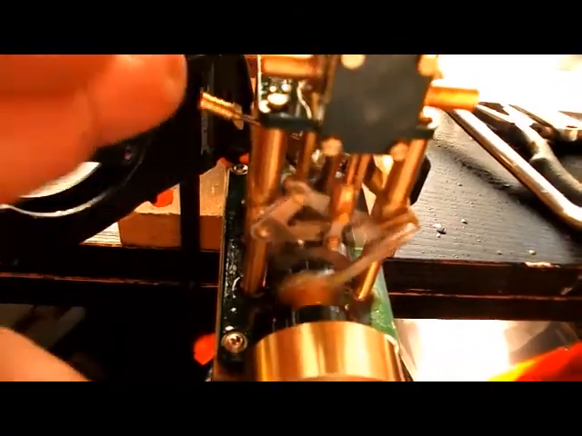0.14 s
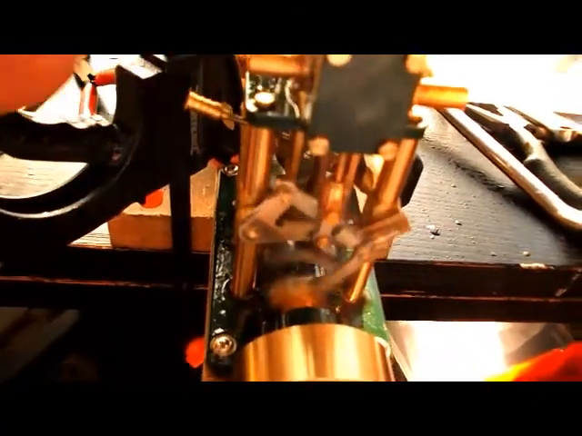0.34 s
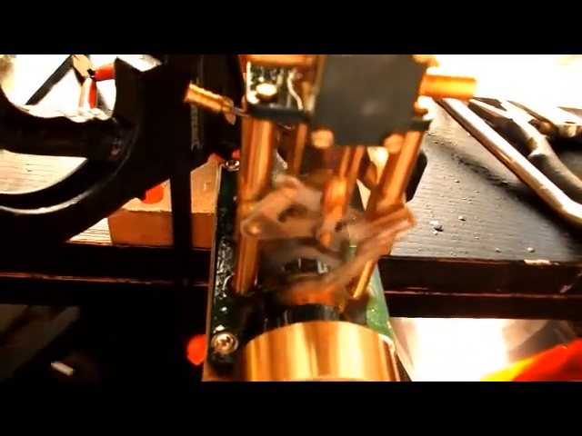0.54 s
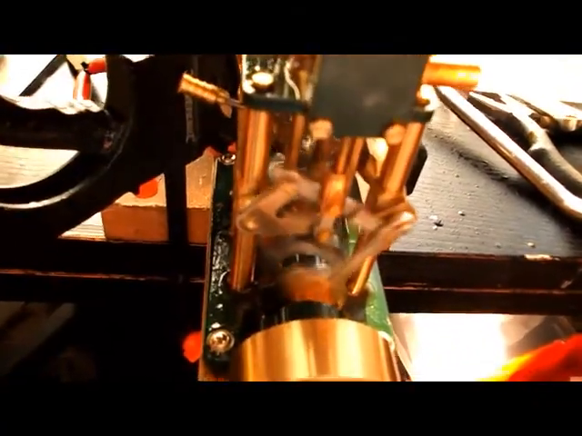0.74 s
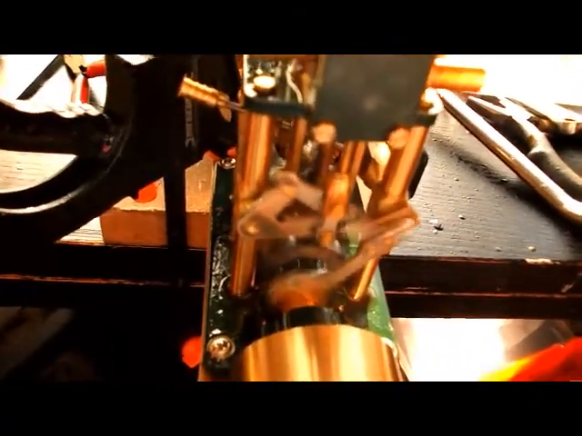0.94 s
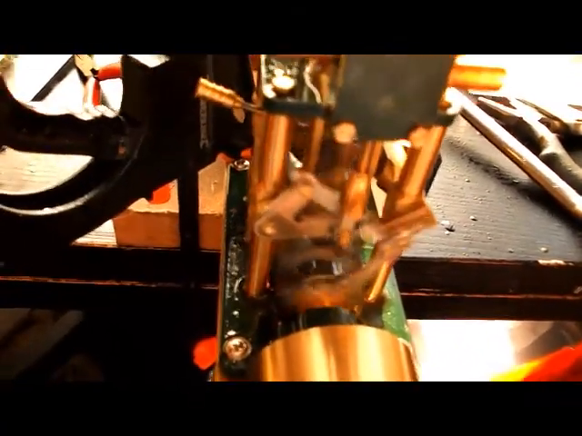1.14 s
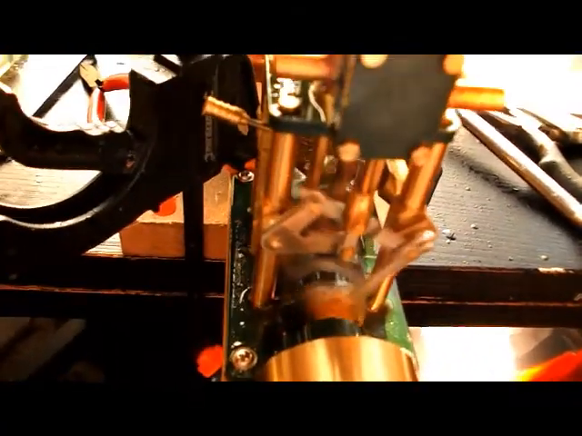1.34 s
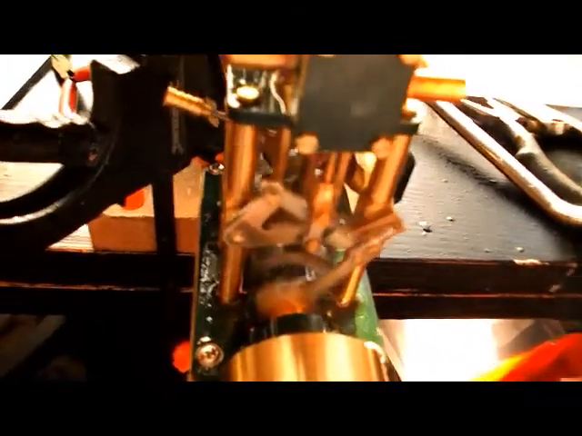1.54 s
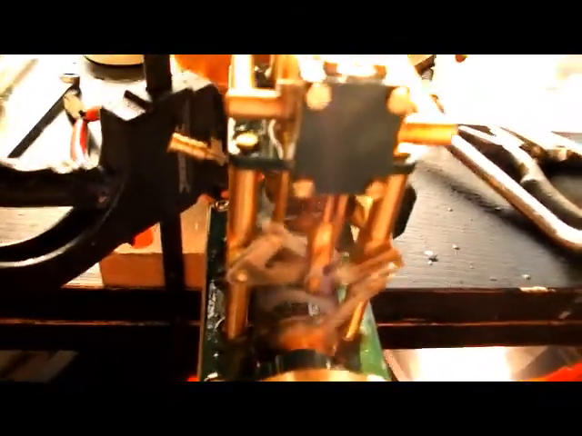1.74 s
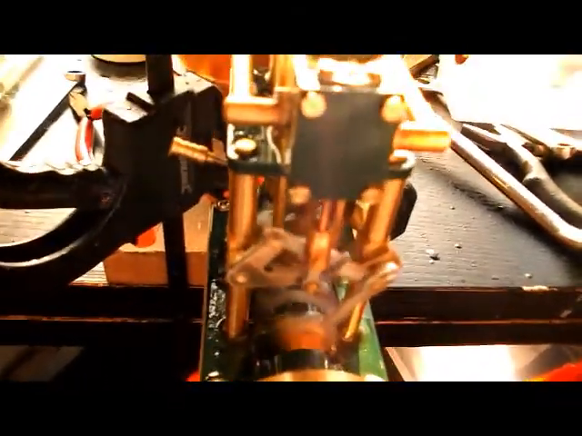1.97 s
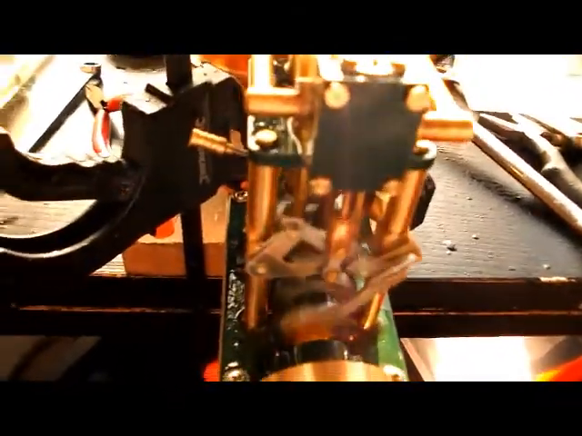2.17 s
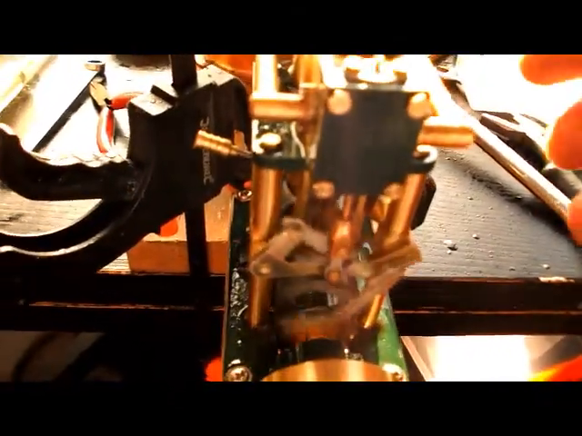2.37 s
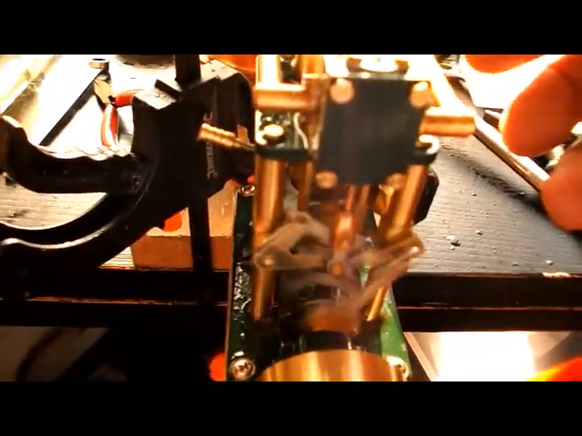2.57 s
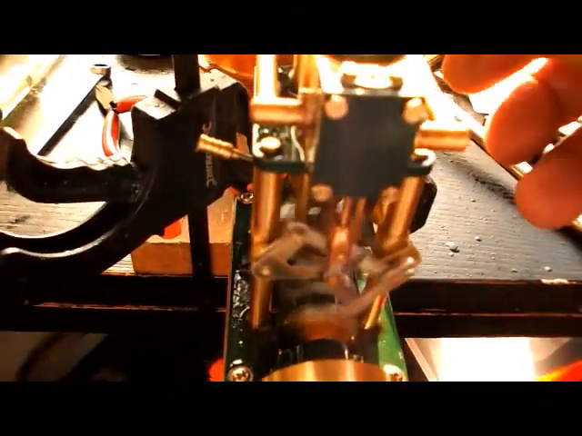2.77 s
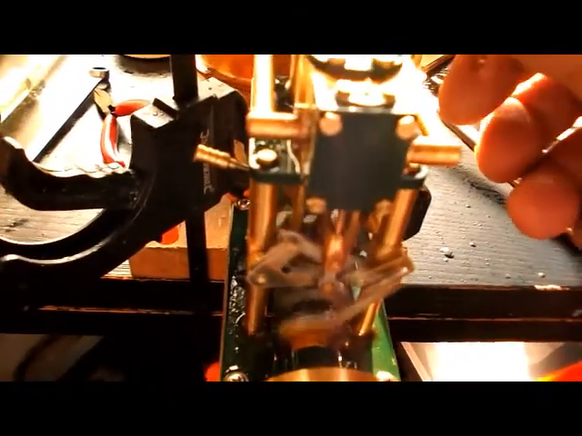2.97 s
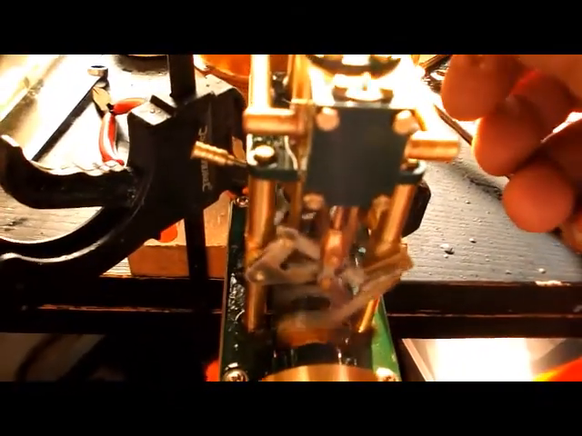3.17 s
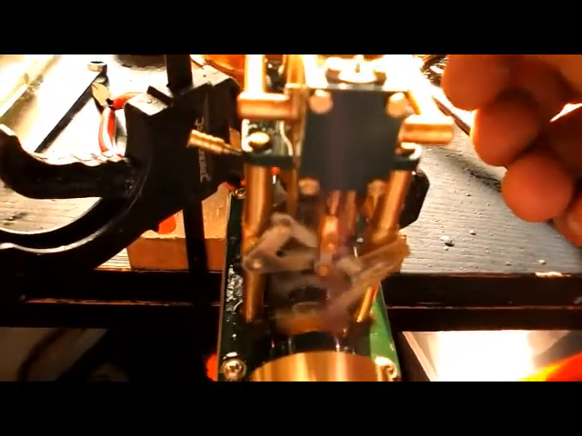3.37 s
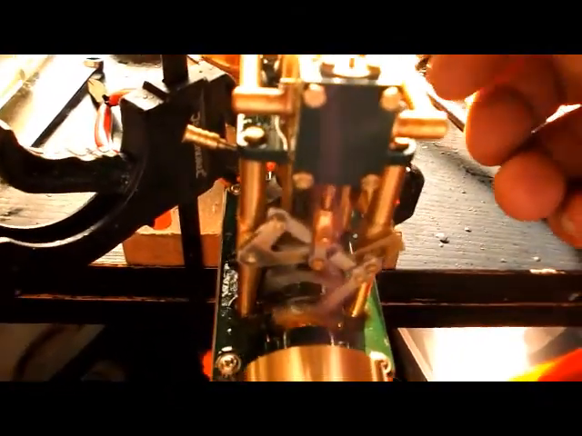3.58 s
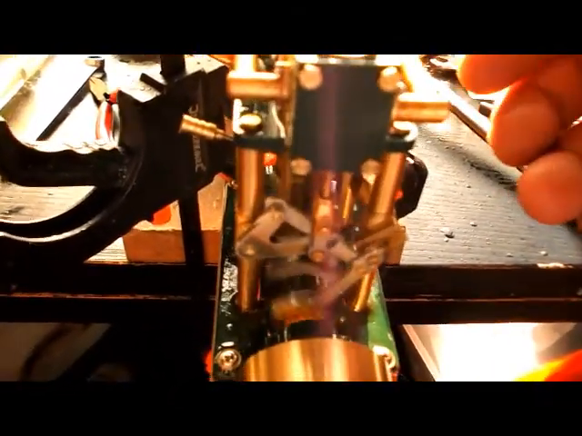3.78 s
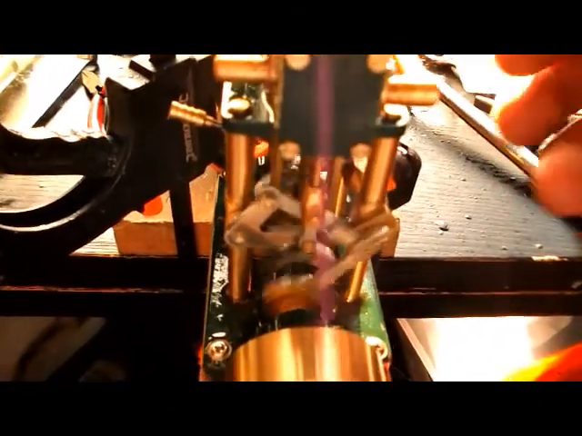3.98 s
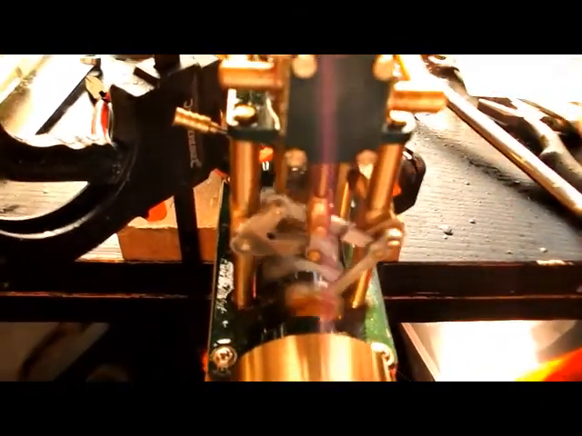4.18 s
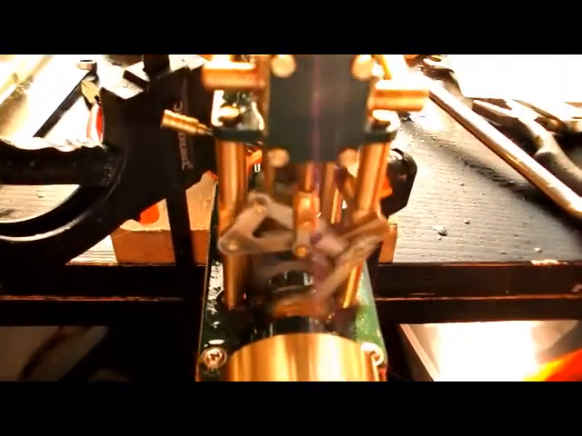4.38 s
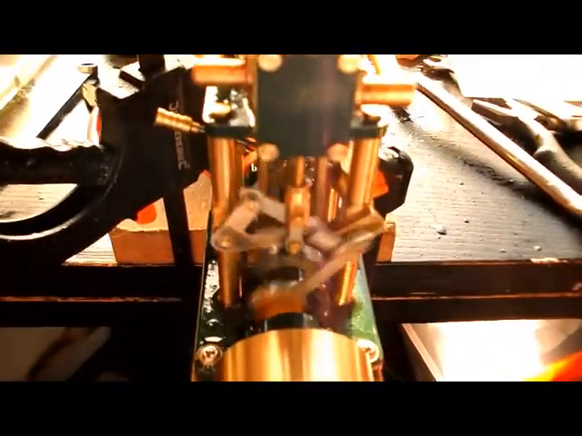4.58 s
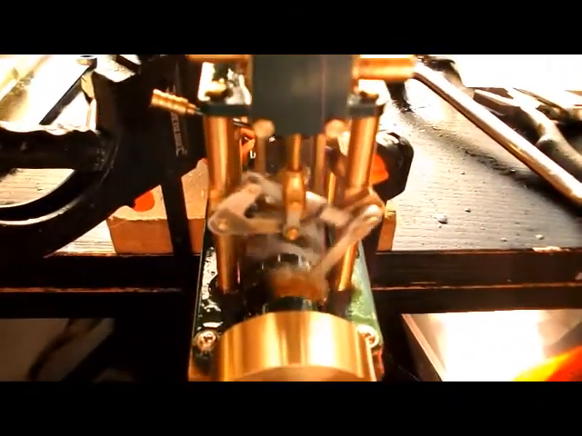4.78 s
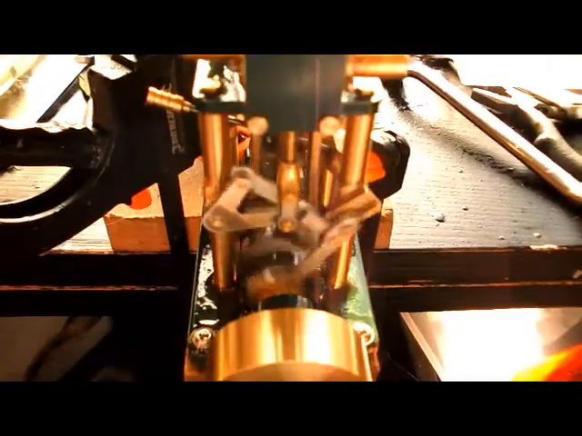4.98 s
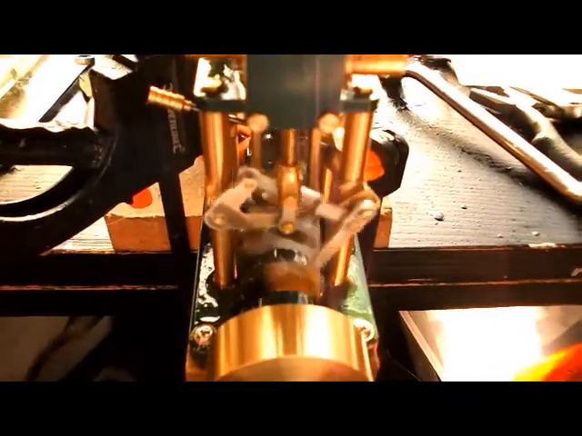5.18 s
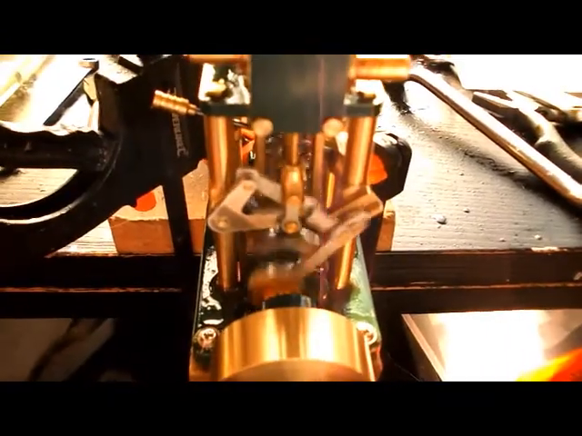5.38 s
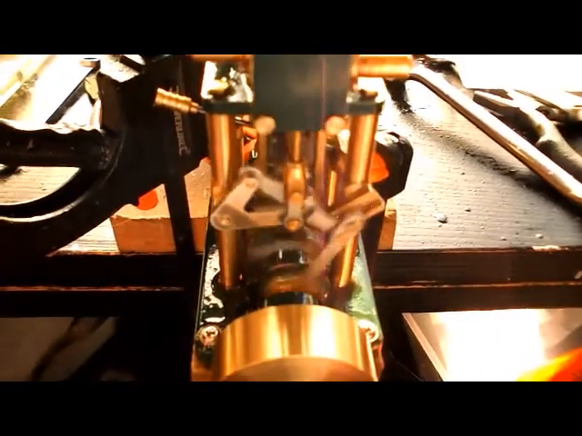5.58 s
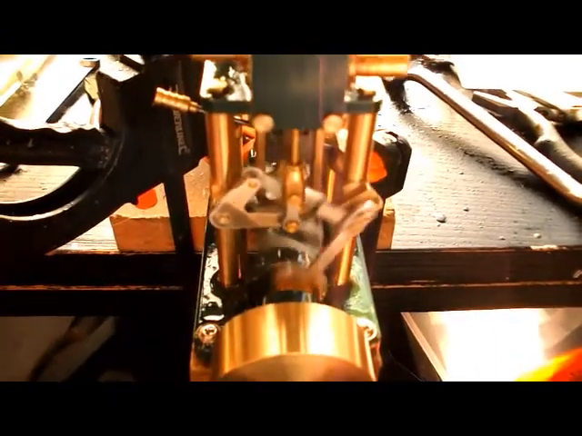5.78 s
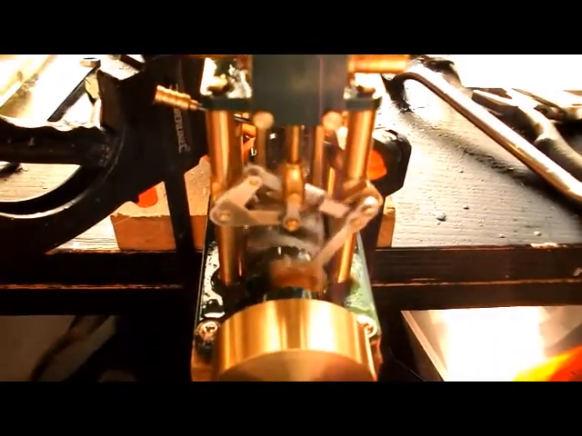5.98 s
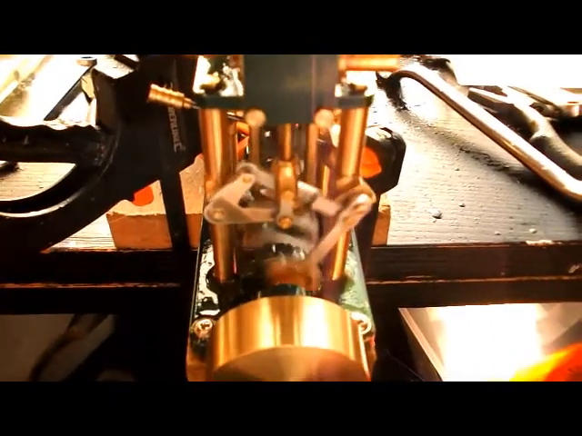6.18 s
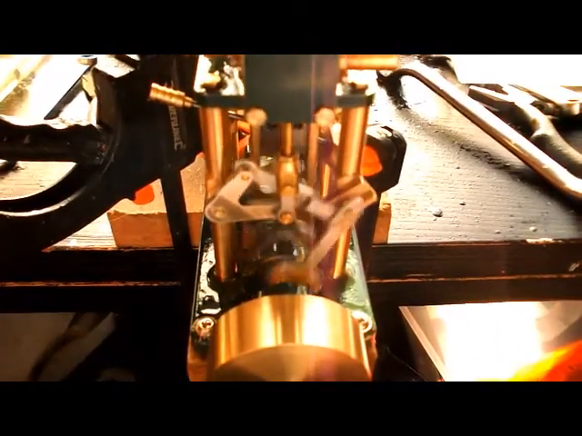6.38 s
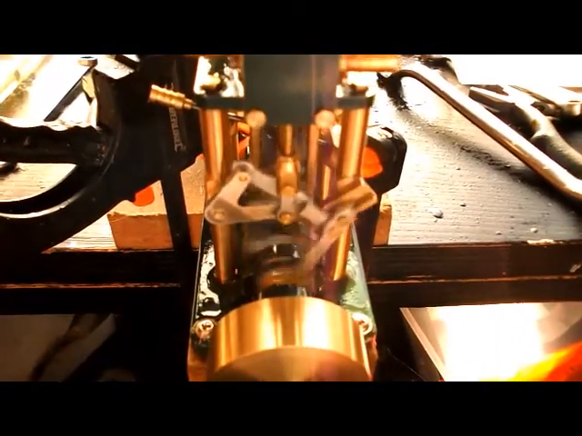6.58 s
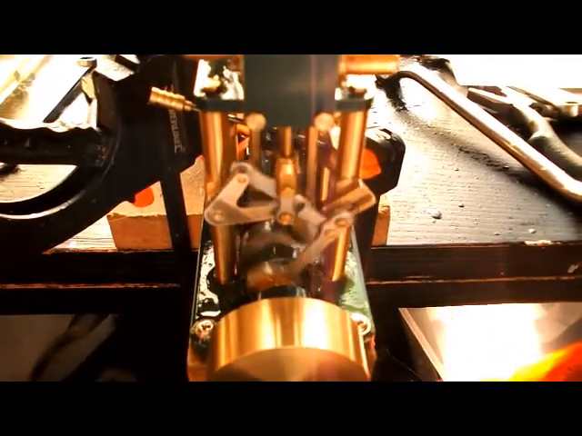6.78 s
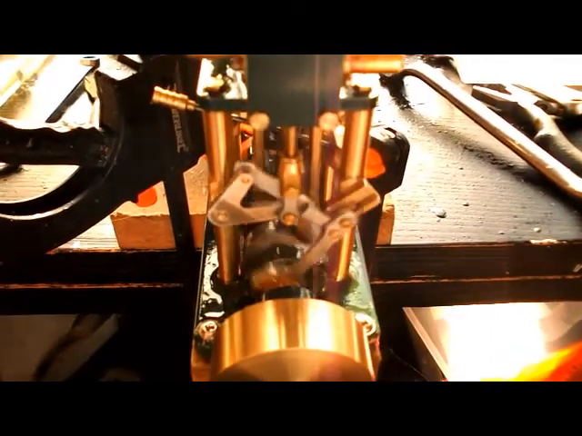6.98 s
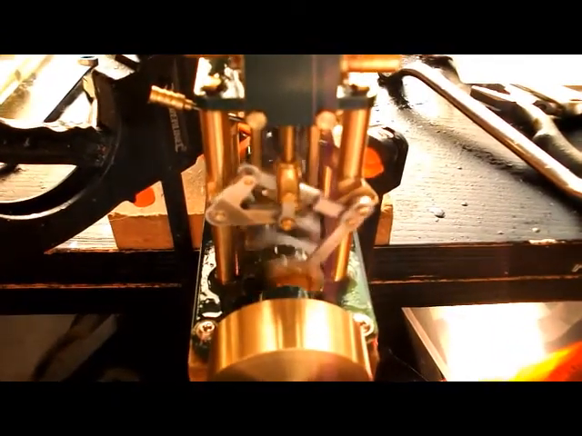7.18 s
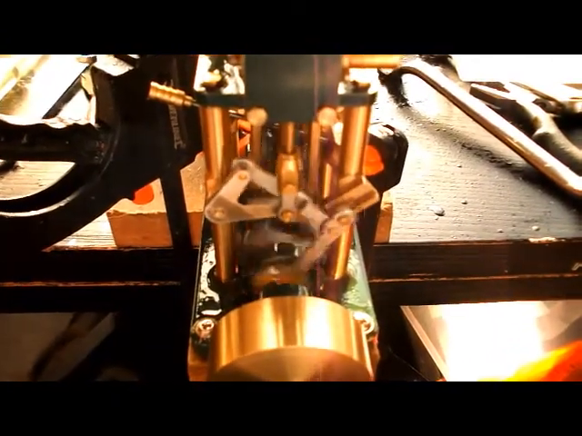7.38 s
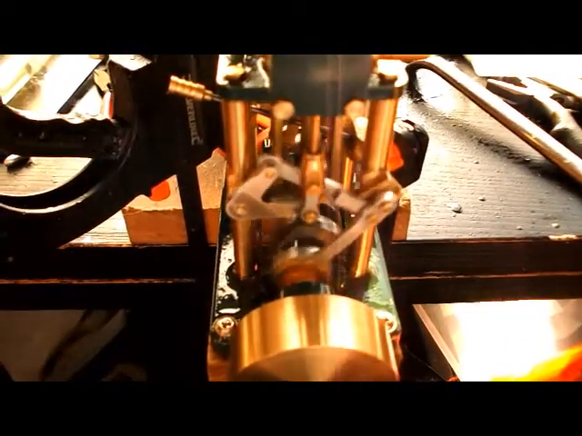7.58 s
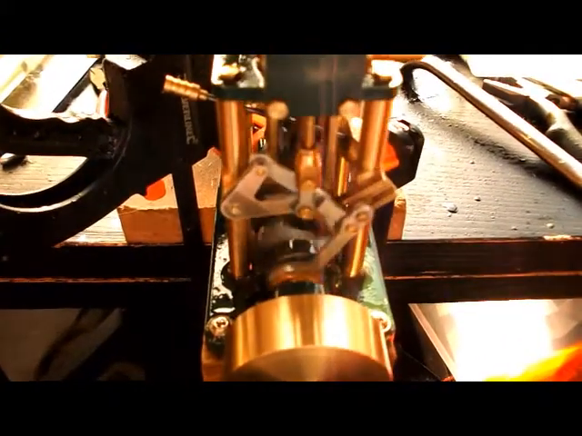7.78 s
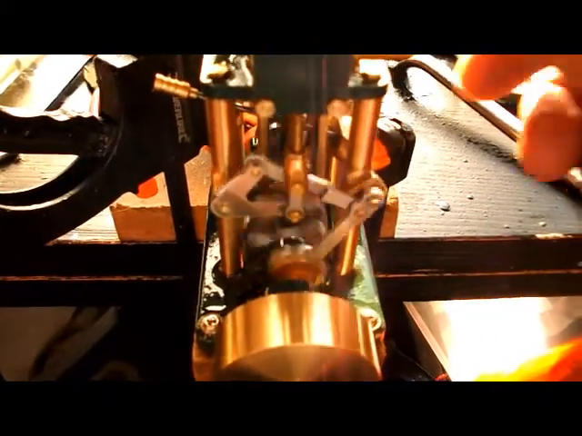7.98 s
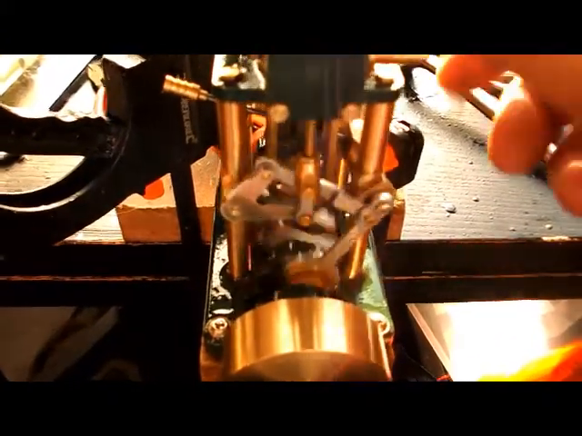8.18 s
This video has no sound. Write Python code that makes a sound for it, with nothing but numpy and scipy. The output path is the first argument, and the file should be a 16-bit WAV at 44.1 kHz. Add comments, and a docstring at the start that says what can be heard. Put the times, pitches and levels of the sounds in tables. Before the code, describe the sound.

Close up on a workbench indoors, a miniature steam engine clicks into motion and runs very fast, with rapid metallic ticking, knocking and pulsing steam hiss above a soft rumble and hum. After about three and a half seconds it is throttled back: the hiss eases, the rhythm falls to roughly half speed, and the light clatter keeps slowing, still turning at the end.

```python
"""A workbench, close up: a small model steam engine starts, races at about 26 turns a second, then is
throttled back and coasts ever slower. Behind it: a low rumble, a throbbing hum, steam hissing from the
glands. The slides scrape and the piston thumps the bench. Each turn the loose joints tick, knock and
ring at set crank angles, every blow a short chatter that excites the resonances of its part."""
import sys
import numpy as np
from scipy import signal
from scipy.fft import rfft, irfft, next_fast_len
from scipy.io import wavfile
from scipy.ndimage import map_coordinates

SR = 44100
rng = np.random.default_rng(int(sys.argv[2]) if len(sys.argv) > 2 else 0)


def inscribe(sig):
    """Save sig as 16-bit PCM at rate SR to the path in sys.argv[1].

    A 1-D sig is mono; a 2-D sig holds one channel per row.
    Samples are clipped to [-1, 1] before scaling.
    """
    pcm = np.round(np.clip(np.atleast_2d(sig).T, -1, 1) * 32767)
    wavfile.write(sys.argv[1], SR, pcm.astype(np.int16))


N = 362937
TIME_S = np.arange(N) / SR
START_TURNS, RACING_TURNS_PER_S = -1.88, 26

# flywheel (time [s], speed [turns/s])
FLYWHEEL_SPEED = [(.09, 10.604), (.19, 24.213), (.39, 26.933), (.65, 26.196), (1.44, 27.019),
                  (3.47, 25.672), (3.59, 16.796), (3.79, 14.061), (4.69, 13.114), (5.6, 11.525),
                  (6.37, 9.121), (6.68, 9.477), (6.94, 8.578), (7.34, 8.489), (7.68, 7.416), (8.23, 4.955)]
# running in (time [s], share of run-in pattern [0-1])
RUN_IN_BLEND = [(1.55, 0.04), (2.2, 0.68)]
# slowing (time [s], share of slow pattern [0-1])
SLOW_BLEND = [(4.9, 0.41), (6.5, 0.96)]
# rumble (frequency [Hz], relative density [dB])
RUMBLE_SPECTRUM = [(10, -13), (22, -1.5), (100, 1), (170, 8), (300, -2.5), (600, -70)]
# leaking steam (frequency [Hz], relative density [dB])
LEAK_SPECTRUM = [(150, -15.5), (500, -4), (1400, -5), (2200, -6), (4000, -5.5), (6500, -5), (9000, -4.5),
                 (11000, -17), (13500, -4), (15800, -8)]
# spurts as the throttle moves (time [s], half length [s], gain [dB])
STEAM_SPURTS = [(.2, 0.04426, 3), (3.45, 0.0854, 2)]
# steam tones (frequency [Hz], width [Hz], relative level [dB])
GLAND_MODES = [(6364, 68.5, -2.0), (7267.2, 484.5, -0.04)]
VALVE_MODES = [(8558, 432.4, 0)]
# resonances per part (frequency [Hz], width [Hz], relative level [dB])
PART_MODES = {"tick": [(1102, 898.7, -8), (4051.8, 920, -5), (6850, 3073.4, -1), (9200, 1785, 1.5),
              (13030, 1451, 0.5), (15657, 1341, -8)], "clack": [(3473.2, 381.8, -4.5), (4182, 419.4, -5.5),
              (5499, 388, -6.5), (6253, 489, -8.5), (7276, 407, -4.5), (8945, 969, -2.5),
              (10488, 650.5, -4.5), (12163, 900, -3.5), (13782, 696, -5.5)], "knock": [(2739.6, 180.44, 1),
              (3725.8, 542.4, 1.5), (3965.6, 795.3, 0), (5194.8, 279.5, 0), (6304.7, 1561.5, -7),
              (8586, 4166, -11), (14013, 4517, -25)], "snap": [(2900, 500, 0), (4000, 900, -1),
              (5250, 600, -1), (7000, 3000, -8)], "chink": [(3729.6, 888, -4), (4377.3, 520, -3),
              (5106.3, 185.9, 3.5), (5757.8, 791.4, -2.5), (8507.5, 1417, -10)],
              "rod": [(2619.8, 83.94, 5.5), (2787.6, 154.25, -3), (3172.8, 790.7, -10.5)],
              "plate": [(924.35, 30.55, 7), (1086.7, 18.94, 13), (1184.3, 29.06, 7), (1658, 27.02, 9)],
              "frame": [(450, 45, -8.5), (551.63, 44.64, -2.5), (801.26, 88.3, -5), (907.58, 67.89, 1.5),
              (1081.6, 58.87, 1.5), (1220.3, 47.13, 0), (1638.1, 66.53, 0.5), (1784, 71.3, -4),
              (1957.4, 115.34, -6.5), (2449.5, 83.43, -8.5)], "bench": [(242.73, 10.505, 2.5),
              (343.22, 86.43, -10.5), (284.49, 20.58, 1), (167, 93.8, -50.5), (455.7, 13, -45)]}
# chatter per part (scattered energy [0-1], time constant [s], share repeating each turn [0-1])
PART_CHATTER = {"tick": (0.9307, 0.00039, 0.6579), "clack": (0.9144, 0.0008667, 0.435),
                "knock": (0.91816, 0.002076, 0.6851), "snap": (.85, .0007, .2),
                "chink": (0.987, 0.001829, 0.6368), "rod": (0.1062, 0.001988, 0),
                "plate": (0.302, 0.002715, 0), "frame": (0.5126, 0.00688, 0),
                "bench": (0.06927, 0.02477, 0)}
# play taken up under steam (crank angle [turns], part, fresh level [dB], run-in level [dB])
DRIVEN_BLOWS = [(-.045, "chink", -15, -36), (-.012, "knock", -12, -9.5), (-.005, "rod", -12, -8),
                (0, "chink", -6, -14.5), (.01, "tick", -17.5, -13.5), (.02, "bench", -18, -11),
                (.135, "knock", -16.5, -18.5), (.137, "tick", -17, -15.5), (.19, "tick", -7.5, -4.5),
                (.2, "frame", -25.5, -15.5), (.245, "knock", -12.5, -7.5), (.255, "rod", -18, -5),
                (.335, "tick", -22.5, -24.5), (.36, "frame", -28.5, -15), (.38, "bench", -24.5, -18.5),
                (.48, "chink", -10.5, -40.5), (.495, "tick", -16, -27.5), (.56, "tick", -13, -19),
                (.645, "knock", -17.5, -15), (.66, "chink", -11.5, -20), (.685, "tick", -21.5, -14),
                (.865, "tick", -11.5, -14)]
# play taken up when coasting (crank angle [turns], part, quick level [dB], slow level [dB])
COASTING_BLOWS = [(-.025, "tick", -15.5, -26.5), (.002, "clack", -25.5, -16), (.064, "snap", -21, -24),
                  (.1, "rod", -20, -22.5), (.112, "knock", -16, -21), (.115, "tick", -12.5, -37),
                  (.13, "frame", -25, -28), (.21, "snap", -23, -24), (.29, "rod", -32, -25.5),
                  (.3, "tick", -13, -45), (.375, "tick", -16, -24), (.385, "rod", -21, -22.5),
                  (.44, "knock", -13.5, -22.5), (.45, "bench", -20, -27), (.457, "tick", -20.5, -18.5),
                  (.46, "frame", -35.5, -29.5), (.657, "snap", -15, -21), (.68, "tick", -11.5, -26.5),
                  (.7, "bench", -19.5, -29.5), (.795, "tick", -15, -31), (.8, "knock", -19.5, -25),
                  (.815, "frame", -30, -24), (.86, "bench", -38.5, -26)]
# harder or softer turns under steam (time [s], half length [s], gain [dB])
DRIVE_LURCHES = [(.51, 0.0091, 4), (.568, 0.01744, -10), (.89, 0.01585, -3), (1.715, 0.0167, -2.5),
                 (1.975, 0.01698, -12.5)]
# passing rattles (start [s], end [s], crank angle [turns], part, first level [dB], last level [dB])
RATTLE_SPELLS = [(3.72, 4.14, .27, "plate", -18, -9), (7.55, 8.23, .004, "snap", -16, -13)]
# single knocks (time [s], part, level [dB])
SINGLE_BLOWS = [(0.0435, "tick", -4.5), (.096, "tick", -5), (.561, "tick", -18), (1.957, "knock", -9),
                (1.958, "bench", -20), (3.497, "knock", -8), (7.624, "plate", -17.5)]
# microphone port notches (frequency [Hz], width [Hz], depth [0-1])
PORT_NOTCHES = [(7686.8, 365.8, 1), (13391, 486.5, 0.57)]


def amp(db):
    """Decibels to gain."""
    return 10 ** (np.asarray(db) / 20)


def unit_rms(x):
    """Scale to rms 1."""
    return x / np.sqrt(np.mean(x ** 2) + 1e-20)


def curve(rows, time_s=TIME_S):
    """Interpolate (time, value) rows."""
    return np.interp(time_s, *np.transpose(rows))


def ramp(start_s, length_s, time_s=TIME_S):
    """Linear rise from 0 to 1."""
    return np.clip((time_s - start_s) / length_s, 0, 1)


def bumps(rows):
    """Gain with brief Gaussian rises and dips."""
    return amp(sum(db * np.exp(-((TIME_S - at_s) / half_s) ** 2) for at_s, half_s, db in rows))


def filtered(x, response):
    """Apply a frequency response."""
    size = next_fast_len(N + SR // 4)
    return irfft(rfft(x, size) * response(np.fft.rfftfreq(size, 1 / SR)), size)[:N]


def peak(f, hz, width_hz):
    """Causal response of one resonance."""
    return 1j * f * width_hz / (hz * hz - f * f + 1j * f * width_hz)


def resonate(x, modes):
    """Parallel resonances of alternating sign; a flat input keeps its energy."""
    def response(f):
        h = sum((-1) ** k * amp(db) * peak(f, hz, width_hz) for k, (hz, width_hz, db) in enumerate(modes))
        return h / np.sqrt(np.mean(abs(h) ** 2))
    return filtered(x, response)


def noise(spectrum):
    """Coloured noise of rms 1."""
    hz, db = np.transpose(spectrum)
    white = rng.standard_normal(N)
    return unit_rms(filtered(white, lambda f: amp(np.interp(np.log(f + 1), np.log(hz), db))))


def stroke(turns, angle_turns, width_turns):
    """One swell per turn around a crank angle."""
    return np.exp((np.cos(2 * np.pi * (turns - angle_turns)) - 1) / (2 * np.pi * width_turns) ** 2)


def steam_pressure(open_s=0.07183, rise_s=0.03223, full_db=1, sag_from_s=1.458, sag_db_per_s=2):
    """Pressure as a gain: builds, holds, sags, is shut off."""
    build = 1 - np.exp(-np.maximum(TIME_S - open_s, 0) / rise_s)
    held = amp(full_db - sag_db_per_s * np.maximum(TIME_S - sag_from_s, 0))
    shut = ramp(start_s=3.5231, length_s=0.1962)
    return build * held * (1 - shut)


def steam_flow(fed_db=-28, pumped_db=-30, rest_db=-7):
    """Escaping steam as a gain: part fed by pressure, part pumped out by the piston."""
    speed_ratio = curve(FLYWHEEL_SPEED) / RACING_TURNS_PER_S
    at_rest = 1 - ramp(start_s=0, length_s=0.0919)
    pumped = amp(pumped_db + rest_db * at_rest) * speed_ratio ** 0.482
    return np.hypot(amp(fed_db) * steam_pressure(), pumped) * bumps(STEAM_SPURTS)


def room(x, t60_s=0.05725, wet_db=-13, gap_s=.002, low_cut_hz=600):
    """Add short reflections from bench top and walls."""
    time_s = np.arange(SR // 3) / SR
    tail = rng.standard_normal(len(time_s)) * amp(-60 * time_s / t60_s) * (time_s > gap_s)
    wet = signal.fftconvolve(x, tail / np.linalg.norm(tail))[:N]
    return x + amp(wet_db) * filtered(wet, lambda f: f / np.hypot(f, low_cut_hz))


def rumble(re_flow_db=-19):
    """Low noise that grows with the steam flow."""
    return amp(re_flow_db) * steam_flow() * noise(RUMBLE_SPECTRUM)


def hum(turns, hz=292, wander_hz=3, level_db=-32, fade_from_s=3.1345, fade_db_per_s=3.5):
    """Low tone: comes up as the engine runs in, throbs with the stroke, fades."""
    wander = map_coordinates(rng.standard_normal(size=128), [TIME_S * 12])
    tone = np.sin(2 * np.pi * np.cumsum(hz + wander_hz * wander) / SR)
    throb = 1 + 0.849 * stroke(turns, angle_turns=0.5814, width_turns=0.228)
    fade_db = fade_db_per_s * np.maximum(TIME_S - fade_from_s, 0)
    return ramp(start_s=1.8574, length_s=1.142) * amp(level_db - fade_db) * unit_rms(tone * throb)


def steam(turns, leak_re_flow_db=3, gland_re_flow_db=-7, valve_re_flow_db=-3):
    """The leak swells with the stroke, the gland sings, the valve whistles once a turn."""
    puff = unit_rms(1 + stroke(turns, angle_turns=0.16615, width_turns=0.25394))
    valve_open = stroke(turns, angle_turns=0.6661, width_turns=0.0457)
    leak = amp(leak_re_flow_db) * noise(LEAK_SPECTRUM) * puff
    gland = amp(gland_re_flow_db) * resonate(rng.standard_normal(N), GLAND_MODES)
    valve = amp(valve_re_flow_db) * resonate(rng.standard_normal(N), VALVE_MODES) * valve_open
    return steam_flow() * (leak + gland + valve)


def friction_gain(racing_db=-27, fresh_db=-3, rest_db=-15):
    """Slide friction grows with speed and with running in."""
    fresh = 1 - curve(RUN_IN_BLEND)
    at_rest = 1 - ramp(start_s=0.0842, length_s=0.0807)
    speed_ratio = curve(FLYWHEEL_SPEED) / RACING_TURNS_PER_S
    return amp(racing_db + fresh_db * fresh + rest_db * at_rest) * speed_ratio


def slides(turns, bench_db=-45):
    """The crosshead rubs the same rough surface each turn: the frame buzzes, the bench murmurs."""
    surface = map_coordinates(rng.standard_normal(size=1024), [turns % 1 * 1023])
    repeating = unit_rms(surface * np.sqrt(abs(np.gradient(turns))))
    friction = repeating + 0.771 * rng.standard_normal(N)
    load = .42 + stroke(turns, angle_turns=.34, width_turns=.12)  # hardest in mid-stroke
    frame = unit_rms(resonate(friction * load, PART_MODES["frame"]))
    bench = resonate(rng.standard_normal(N), PART_MODES["bench"])
    return friction_gain() * frame + amp(bench_db) * ramp(start_s=0, length_s=0.06425) * bench


def contacts(times_s, db, part):
    """Impulses with chatter that partly repeats from blow to blow; db is the level over 1 ms."""
    scattered, decay_s, repeating = PART_CHATTER[part]
    length = int(5 * decay_s * SR) + 2
    shared_grit = np.sqrt(repeating) * rng.standard_normal(SR // 8)[:length]
    fresh_grit = np.sqrt(1 - repeating) * rng.standard_normal((length, len(times_s))).T
    bursts = (shared_grit + fresh_grit) * np.exp(-np.arange(length) / SR / decay_s)
    bursts *= np.sqrt(scattered) / np.linalg.norm(bursts, axis=1, keepdims=True)
    bursts[:, 0] += np.sqrt(1 - scattered)
    bursts *= amp(db)[:, None] * np.sqrt(SR / 1000)
    samples = np.round(np.asarray(times_s) * SR).astype(int)[:, None] + np.arange(length)
    return np.bincount(samples.ravel(), bursts.ravel(), N)[:N]


def passing_times_s(turns, angle_turns):
    """When the crank passes an angle; passes never reached fall after the end."""
    whole_turns = np.arange(-1, turns[-1])
    return np.interp(whole_turns + angle_turns, turns, TIME_S, right=2 * TIME_S[-1])


def linkage(turns, loose_db=1.5, pivot_db=-19, scatter_db=0.9355, jitter_s=.00004):
    """Each loose joint strikes at its crank angle; the pattern shifts with running in and slowing."""
    blows = {part: np.zeros(N) for part in PART_MODES}
    driven = steam_pressure() * bumps(DRIVE_LURCHES)
    unloaded = amp(loose_db) * ramp(start_s=3.5, length_s=0.1614)
    patterns = [(DRIVEN_BLOWS, driven, RUN_IN_BLEND), (COASTING_BLOWS, unloaded, SLOW_BLEND)]
    for table, force, blend in patterns:
        for angle_turns, part, first_db, last_db in table:
            times_s = passing_times_s(turns, angle_turns)
            timing, strength = rng.standard_normal((len(times_s), 2)).T
            times_s += jitter_s * timing
            db = first_db + (last_db - first_db) * curve(blend, times_s) + scatter_db * strength
            near_stall = ramp(start_s=7.3862, length_s=0.8865, time_s=times_s)
            db += (db - pivot_db) * near_stall  # light blows fade, heavy ones stand out
            blows[part] += force * contacts(abs(times_s), db, part)
    for start_s, end_s, angle_turns, part, first_db, last_db in RATTLE_SPELLS:
        times_s = passing_times_s(turns, angle_turns)
        times_s = times_s[(times_s > start_s) & (times_s < end_s)]
        db = np.interp(times_s, [start_s, end_s], [first_db, last_db])
        blows[part] += contacts(times_s, db, part)
    for at_s, part, db in SINGLE_BLOWS:
        blows[part] += contacts([at_s], [db], part)
    return sum(resonate(blows[part], modes) for part, modes in PART_MODES.items())


def scene():
    """Rumble, engine, hum and steam in mono, timed by one crank."""
    turns = START_TURNS + np.cumsum(curve(FLYWHEEL_SPEED)) / SR
    background = rumble()
    engine = room(linkage(turns) + slides(turns))
    return (background + hum(turns) + steam(turns) + engine)[None]


def record(dry, top_hz=15950):
    """The microphone port cuts two notches; the loudest ticks saturate; the top is cut off."""
    def port(f):
        notches = [1 - depth * peak(f, hz, width_hz) for hz, width_hz, depth in PORT_NOTCHES]
        return np.prod(notches, axis=0)
    notched = filtered(dry[0], port)
    saturated = notched / (1 + abs(notched) ** 6) ** (1 / 6)
    return filtered(saturated, lambda f: f < top_hz)[None]


dry = scene()
out = record(dry)
inscribe(out)
```